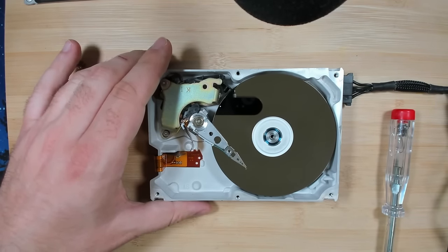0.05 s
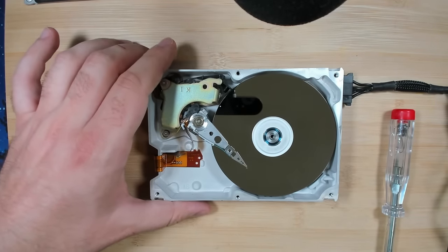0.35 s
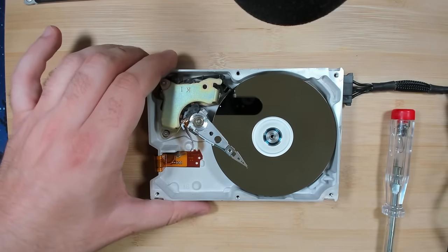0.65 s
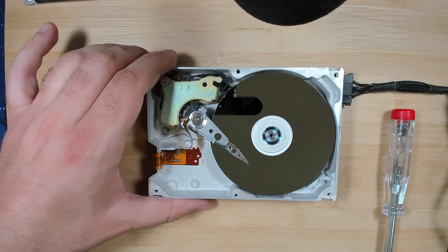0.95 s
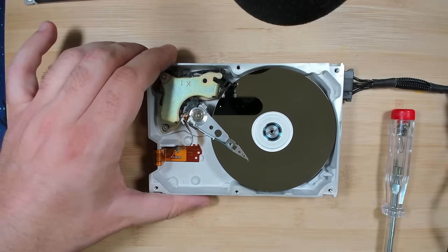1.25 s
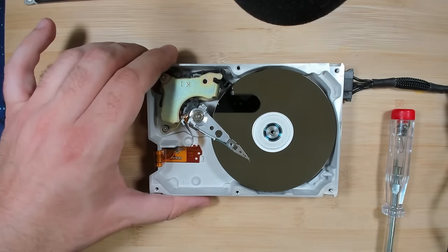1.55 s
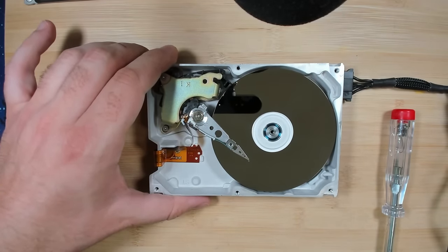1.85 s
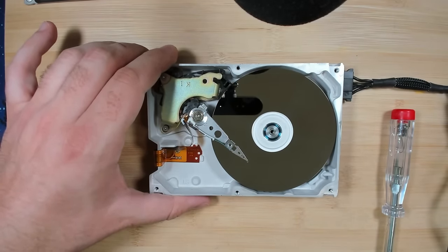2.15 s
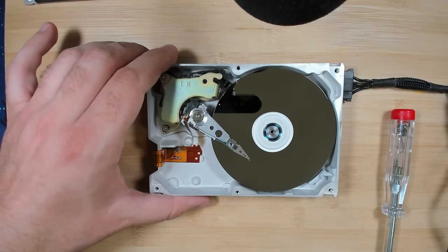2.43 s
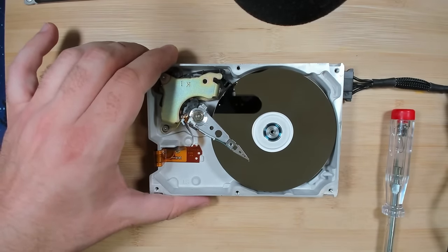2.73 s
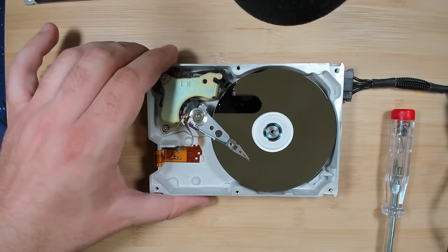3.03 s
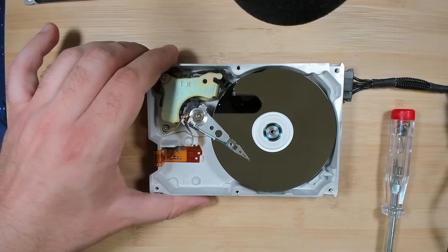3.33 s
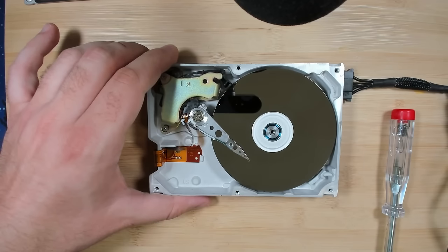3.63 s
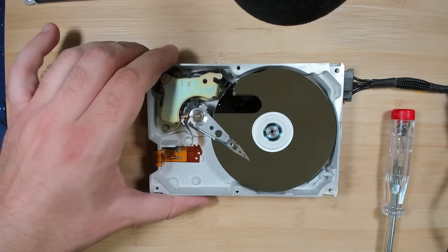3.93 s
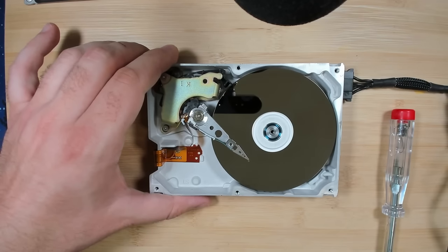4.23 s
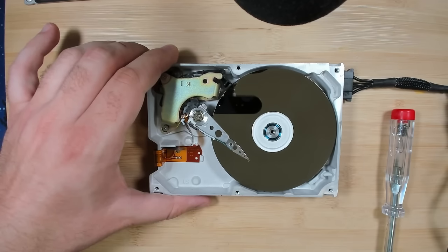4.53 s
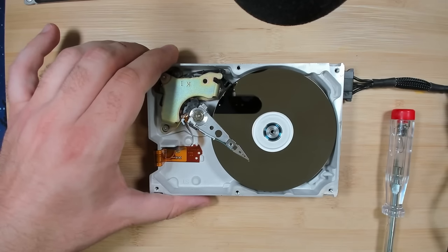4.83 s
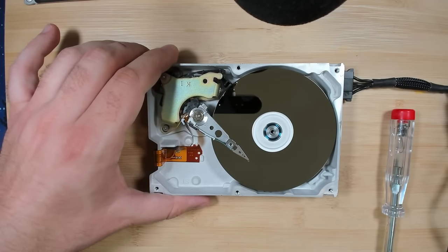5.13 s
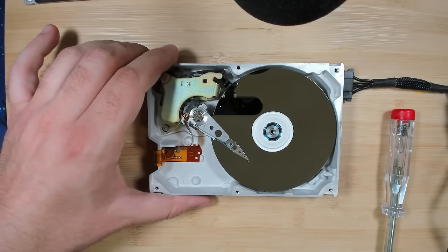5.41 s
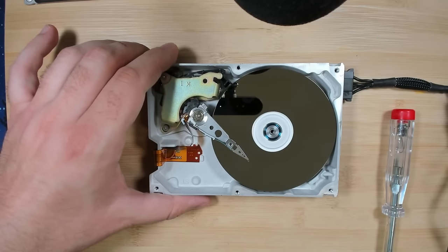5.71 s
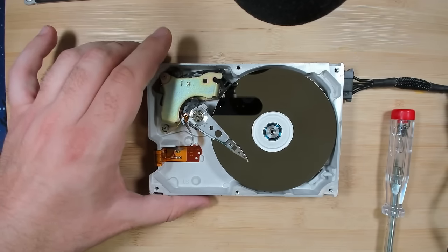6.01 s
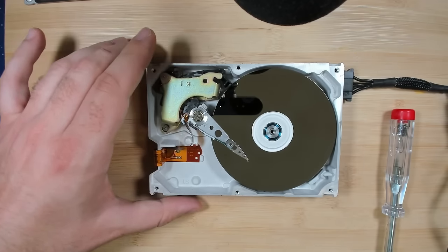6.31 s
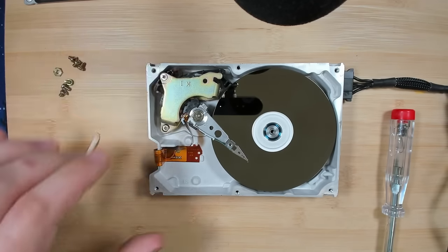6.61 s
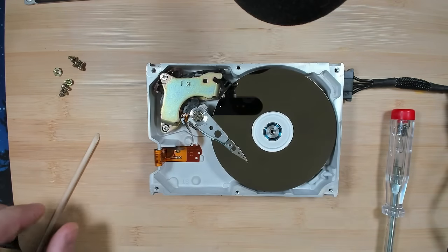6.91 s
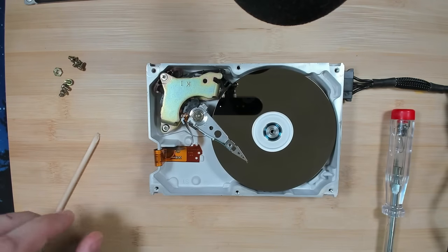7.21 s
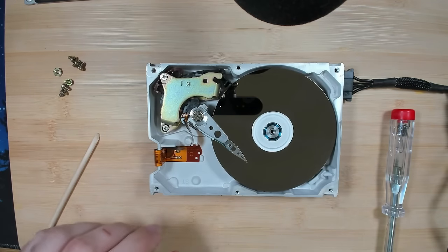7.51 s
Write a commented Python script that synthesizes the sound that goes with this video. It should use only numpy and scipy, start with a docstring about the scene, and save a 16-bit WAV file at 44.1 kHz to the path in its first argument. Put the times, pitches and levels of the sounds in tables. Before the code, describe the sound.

A harsh metallic scrape opens as a hard drive's head drags on its spinning platter, heard up close on a desk in a small, quiet room. The scrape drops to lighter rubbing over the climbing whine of motor and bearing. The head keeps catching, with fast ticks, high chirps and one short falling squeal, and a few soft knocks sound. Loud, ringing grinding returns at the end as the whine sags a little.

```python
"""An opened hard drive spins up on a wooden desk, its motor and worn ball bearing whining upwards.
From the start the head grinds on the platter and friction makes the arm sing. At 0.8 s it lifts to a
light rub and, while a hand holds the casing, stutters with each turn, ticking and squeaking as it catches.
Dull knocks sound nearby: a faint one at 1.5 s, one at 2 s, then two around a falling squeal at 5.1 s.
From 6.6 s the head grinds again and brakes the disc. The room murmurs underneath throughout."""
import sys
import numpy as np
from scipy import signal
from scipy.fft import rfft, irfft
from scipy.io import wavfile

SR = 44100
rng = np.random.default_rng(int(sys.argv[2]) if len(sys.argv) > 2 else 0)


def inscribe(sig):
    """Save sig as 16-bit PCM at rate SR to the path in sys.argv[1].

    A 1-D sig is mono; a 2-D sig holds one channel per row.
    Samples are clipped to [-1, 1] before scaling.
    """
    pcm = np.round(np.clip(np.atleast_2d(sig).T, -1, 1) * 32767)
    wavfile.write(sys.argv[1], SR, pcm.astype(np.int16))


N = 333396
TIME = np.arange(N) / SR
FILTER_HZ = np.arange(4097) * SR / 8192


def from_db(db):
    """Decibels to gain."""
    return 10 ** (np.asarray(db) / 20)


def unit_rms(x):
    """Scale to unit power."""
    return x / np.sqrt(np.mean(x ** 2) + 1e-20)


def automation(rows):
    """Read each lane of a breakpoint curve at every sample."""
    times, *lanes = np.transpose(rows)
    return [np.interp(TIME, times, lane) for lane in lanes]


def eq_db(points, hz):
    """Read an EQ curve on a log-frequency axis."""
    knots, db = np.transpose(points)
    return np.interp(np.log(np.maximum(hz, 1)), np.log(knots), db)


def drift(rate):
    """Smooth random modulation of unit power, renewed `rate` times a second."""
    return unit_rms(np.interp(TIME * rate, np.arange(4096), rng.standard_normal(4096)))


def equalise(x, gain):
    """Minimum-phase filter with the given gain at each of FILTER_HZ."""
    cepstrum = irfft(np.log(gain + 1e-9))
    half = len(cepstrum) // 2
    cepstrum[1:half] *= 2
    cepstrum[half + 1:] = 0
    return signal.oaconvolve(x, irfft(np.exp(rfft(cepstrum))))[:N]


def coloured_noise(curve_db):
    """Unit-power noise shaped by an EQ curve."""
    return unit_rms(equalise(rng.standard_normal(N), from_db(curve_db)))


# EQ of the room tone: (frequency [Hz], gain [dB])
ROOM_EQ = [(15, -84), (25, -15), (80, 0.5), (107, -3.5), (151, 3.5), (189, -18), (245, 1), (275, -2),
           (298, -0.5), (362, -13.5), (461, -10), (648, -10.5), (926, -10), (1200, -10), (1560, -42),
           (2640, -120)]
# hum tones: (frequency [Hz], level [dB])
HUM_TONES = [(100, -69.5), (269, -76)]


def room_tone(air_db):
    """A bed of low, murmuring air with a faint hum."""
    air = coloured_noise(eq_db(ROOM_EQ, FILTER_HZ))
    hum = sum(from_db(db) * np.sqrt(2) * np.sin(2 * np.pi * hz * TIME) for hz, db in HUM_TONES)
    return from_db(air_db) * air + hum


# spin-up and braking: (time [s], speed [turns/s])
SPIN_CURVE = [(0.0, 31.92), (0.8, 35.96), (1.3, 39.36), (1.65, 42.0), (2.0, 44.26), (2.25, 45.44),
              (2.6, 47.93), (3.0, 50.57), (3.5, 53.55), (4.0, 56.25), (4.5, 58.1), (5.0, 59.64),
              (5.5, 60.68), (6.0, 61.51), (6.55, 61.94), (7.1, 60.68), (7.56, 59.86)]


def rotation():
    """The platter's running count of turns and its speed, which drive whine and stutter."""
    speed, = automation(SPIN_CURVE)
    return np.cumsum(speed) / SR, speed


# body EQ of the casing: (frequency [Hz], gain [dB])
CASING_EQ = [(600, -31.5), (1000, -19), (1250, -14.5), (1550, -8), (1750, -5.5), (2000, -2.5), (2600, -2),
             (3100, -1.5), (3400, 1.5), (4100, -3.5), (5000, -13.5), (7400, -13), (9000, -19), (12000, -30)]


def casing_db(hz):
    """How strongly the casing radiates the spindle's vibration at this pitch."""
    return eq_db(CASING_EQ, hz)


# tone curve of the ball passes: (harmonic [number], gain [dB])
BALL_TONE = [(1, -8), (4, -8), (5, -2), (6, 0), (7, 0), (8, -1), (9, 1), (10, 1), (11, -7), (12, -1),
             (13, -3), (16, -4), (19, -3), (26, -9)]
# cluster around each harmonic: (offset [multiples of the cage rate], gain [dB])
CAGE_SIDEBANDS = [(-2, -14.5), (-1, -7.5), (0, -4), (1, -44.5), (2, -8)]


def bearing(turns, speed, waver, balls=8, passes_per_turn=4.775, harmonics=26):
    """Balls roll over a flaw in the race; unequal balls give each harmonic sidebands at the cage rate."""
    passes = passes_per_turn * turns
    sidebands = np.array([from_db(db) * np.exp(2j * np.pi * round(offset) * passes / balls)
                          for offset, db in CAGE_SIDEBANDS])
    slip = .006 * drift(35)  # slipping balls blur the high harmonics most
    fundamental = np.exp(2j * np.pi * (passes + slip))
    harmonic, out = 1, np.zeros(N)
    for k in range(1, harmonics + 1):
        harmonic = harmonic * fundamental
        cluster = np.exp(2j * np.pi * rng.random(len(sidebands))) @ sidebands
        gain = from_db(eq_db(BALL_TONE, k) + casing_db(k * passes_per_turn * speed))
        out += gain * (1 + waver * drift(15)) * (cluster * harmonic).real
    return out


# tones locked to the rotation: (pitch [multiples of the turn rate], gain [dB]); orders 24 and 62 come from
# waviness of the bearing races, the rest from the motor
LOCKED_PARTIALS = [(24, -5), (36, 1), (62, -6), (72, -1), (108, 4), (144, 0), (162, -3), (180, 4), (204, -2),
                   (216, 1)]


def motor(turns, speed, waver_db):
    """Cogging and switching of the motor, and waviness of the bearing races, make clean tones locked to the
    rotation."""
    out = np.zeros(N)
    for order, db in LOCKED_PARTIALS:
        gain = from_db(db + casing_db(round(order) * speed) + waver_db * drift(11))
        out += gain * np.sqrt(2) * np.sin(2 * np.pi * round(order) * turns)
    return out


# fader rides of the whine: (time [s], bearing gain [dB], gain of the locked motor and waviness tones [dB])
WHINE_FADERS = [(0, -45.5, -63), (.9, -53, -54), (1.4, -53, -60), (1.55, -51.5, -55.5), (2.3, -51.5, -52),
                (3.2, -48, -58), (4.5, -50.5, -53), (6.5, -49, -62), (7.56, -45.5, -54)]


def spindle(turns, speed):
    """Bearing whine, rolling hiss, and clean tones from the motor and the wavy races, all coloured by the
    casing."""
    bearing_db, motor_db = automation(WHINE_FADERS)
    hiss = coloured_noise(casing_db(FILTER_HZ))
    rolling = bearing(turns, speed, waver=.2) + from_db(-4) * hiss
    return from_db(bearing_db) * rolling + from_db(motor_db) * motor(turns, speed, waver_db=1.5)


# grind cues: (hold start [s], hold end [s], level [dB], attack [s])
GRIND_CUES = [(0, 0.799, -25, .02), (1.279, 1.292, -23, 0.02), (1.967, 1.986, -27.5, .005),
              (2.075, 2.257, -25, 0.045), (5.315, 5.41, -29, 0.02), (6.63, 6.953, -25.5, 0.049),
              (6.996, 7.04, -28.5, 0.044), (7.174, 7.6, -24.5, 0.11)]


def grinding(release_s=.026, tail_db=-9.5, tail_s=.079):
    """Force envelope of the head digging in: it swells, holds, lets go and leaves a fading rub."""
    force = np.zeros(N)
    for start, end, db, attack_s in GRIND_CUES:
        early, late = np.maximum(start - TIME, 0), np.maximum(TIME - end, 0)
        release = np.maximum(np.exp(-late / release_s), from_db(tail_db) * np.exp(-late / tail_s))
        force = np.maximum(force, from_db(db) * np.exp(-early / attack_s) * release)
    return force


def friction(grains_per_s, spread_db, hiss):
    """Grit of tiny, uneven impacts over a smooth hiss; unit power."""
    sizes = from_db(spread_db * np.minimum(rng.exponential(1, N), 4)) * rng.choice([-1, 1], N)
    grains = unit_rms(sizes * (rng.random(N) < grains_per_s / SR))
    return unit_rms(grains + hiss * rng.standard_normal(N))


# brightness of the light rub: (time [s], treble against the lower band [dB])
RUB_TREBLE = [(1.2, -7.5), (1.85, -6.5), (2.4, -12), (3.7, -12.5), (4.3, -9), (6.1, -9.5), (6.55, -7.5)]


def brightness_db(grind, touch, speed, bite_db=-36):
    """Treble balance of the scrape: once the head bites, a faster platter sounds brighter."""
    dug_in = grind / (grind + touch + from_db(bite_db))
    grind_db = -4 + .1461 * (speed - speed.mean())
    rub_db, = automation(RUB_TREBLE)
    return dug_in * grind_db + (1 - dug_in) * rub_db


# broad EQ of the scrape: (frequency [Hz], gain [dB])
SCRAPE_EQ = [(200, -26), (400, -26.5), (650, -24.5), (1150, -24.5), (1500, -18.5), (2400, -17.5),
             (3200, -5), (4700, -2.5), (5400, -8.5), (7000, -13), (7700, -13.5), (10000, -8),
             (13400, -13.5), (14400, -24)]
# resonances: (frequency [Hz], width [Hz], first-grind gain [dB], stutter gain [dB], last-grind gain [dB])
DRIVE_RESONANCES = [(1042, 499, -5, 2, -6), (1729, 103, 4, 13, 6), (2084, 111, 9, 10, 7),
                    (2685, 69, 10, 5, 2), (2921, 133, 6, 7, 3), (3103, 112, 3, 11, 10),
                    (3345, 133, 11, 11, 10), (3446, 145, 10, 5, 8), (3571, 101, 8, 9, 2),
                    (3773, 154, -8, 6, 7), (3902, 57, 9, -1, -2), (4231, 165, 5, 2, 5),
                    (4553, 172, 9, 9, 10), (4715, 176, 2, 5, -3), (5077, 185, -4, -7, -8),
                    (5194, 154, -1, 5, 9), (6028, 209, 6, 5, 4), (6632, 209, 12, 12, 16),
                    (7013, 235, 15, 10, 15), (8318, 147, 4, 10, 8), (8594, 211, 15, -1, 5),
                    (9409, 296, -2, -3, 7), (10080, 208, -1, 3, 8), (10374, 322, 4, -1, -1),
                    (11199, 339, 12, 11, 16), (11926, 215, 10, 5, 11), (12691, 127, 5, 5, 16),
                    (13069, 229, 8, 6, 16), (14805, 201, 15, 10, 16), (15508, 127, -1, 1, 13)]


def drive_ring(rub, treble_db, crossover_hz=7800):
    """Friction rings arm, platter and casing; the peaks change height as the head bears differently."""
    # crossfade of three EQs: the head eases off in two steps and bears down again at 6.6 s
    stage = np.interp(TIME, [.9, 1.2, 2.3, 2.5, 6.56, 6.62], [0, .5, .5, 1, 1, 2])
    modes = np.array(DRIVE_RESONANCES)
    centres, widths = modes[:, :1], modes[:, 1:2]
    bells = 1 / (1 + ((FILTER_HZ - centres) / (widths / 2)) ** 2)
    treble = 1 / (1 + (crossover_hz / np.maximum(FILTER_HZ, 100)) ** 24)
    out = np.zeros(N)
    for k, heights_db in enumerate(modes[:, 2:].T):
        gain = from_db(eq_db(SCRAPE_EQ, FILTER_HZ) + heights_db @ bells)
        part = rub * np.clip(1 - abs(stage - k), 0, 1)
        out += equalise(part, unit_rms(gain * (1 - treble)))
        out += equalise(part * from_db(treble_db), unit_rms(gain * treble))
    return out


def high_spot(turns, angle_turns, fade_turns, uneven_db):
    """A high spot of the platter pulses against the head on each turn, never twice alike."""
    laps = turns + 1 - angle_turns
    strength = from_db(uneven_db * np.clip(rng.standard_normal(1024), -2, 2))
    return unit_rms(strength[laps.astype(int)] * np.exp(-(laps % 1) / fade_turns))


def stutter(pulse, share):
    """Steady contact with a share of its power (0-1) moved into the pulse."""
    return np.sqrt(1 - share + share * pulse ** 2)


# fader ride of the head's light rub between grinds: (time [s], level [dB])
RUB_FADER = [(.9, -50), (1.08, -65.5), (1.24, -47.5), (1.58, -62.5), (1.88, -58), (2.5, -52.5),
             (2.72, -48.5), (3.1, -52.5), (3.38, -42.5), (4.0, -38), (4.46, -38), (4.57, -40), (4.7, -36),
             (4.91, -34), (5.08, -33), (5.22, -35.5), (5.5, -34), (5.72, -39.5)]


def scrape(turns, speed):
    """The head drags on the platter: grinds, light rub and catches drive one friction texture."""
    touch_db, = automation(RUB_FADER)
    grind, touch = grinding(), from_db(touch_db)
    pulse = high_spot(turns, angle_turns=.8, fade_turns=.33, uneven_db=5.1)
    drag = np.hypot(grind * stutter(pulse, share=.1), touch * stutter(pulse, share=.7))
    drag *= from_db(.13 * drift(250))
    hits = scored_spots(turns, touch_db, uneven_db=5.2) + hard_catches()
    bursts, ticks = snags(hits, burst_db=-4.5, tick_db=1)
    rub = ticks + np.hypot(drag, bursts) * friction(grains_per_s=9000, spread_db=2, hiss=.9)
    return drive_ring(rub, brightness_db(grind, touch, speed))


# held tones in the grinds: (start [s], end [s], pitch [Hz], level [dB])
SINGING_CUES = [(0, .78, 3410, -32), (.3, .78, 4530, -35), (0, .93, 2695, -46), (6.62, 6.96, 3130, -37),
                (6.65, 7.04, 6630, -36), (7.17, 7.6, 3400, -30), (7.17, 7.6, 4490, -37)]


def singing(wander_hz, rough, fade_s=.02):
    """Hard friction feeds single modes of the arm, which ring on unsteadily."""
    out = np.zeros(N)
    for start, end, hz, db in SINGING_CUES:
        held = np.clip(np.minimum(TIME - start, end - TIME) / fade_s, 0, 1)
        phase = 2 * np.pi * np.cumsum(hz + wander_hz * drift(200)) / SR
        out += held * from_db(db) * (1 + rough * drift(150)) * np.sin(phase)
    return out


# runs of ticks: (start [s], end [s], platter angle [turns], accent on the rub fader [dB])
SPOT_RUNS = [(.87, 1.46, .83, 24), (1.8, 1.95, .81, 22), (3.25, 4.52, .84, 12), (5.42, 6.56, .78, 13),
             (2.55, 3.55, .08, 20), (3.55, 4.52, .06, 15.5), (4.66, 4.87, .09, 13), (4.95, 5.19, .09, 11),
             (5.45, 6.56, .09, 9)]


def scored_spots(turns, touch_db, uneven_db, decay_s=.0035):
    """Hits from two scored spots a quarter turn apart, each clipping the head as hard as it bears."""
    hits = []
    for start, end, angle, accent_db in SPOT_RUNS:
        crossings = np.flatnonzero(np.diff(np.floor(turns - angle)))
        scatter_db = uneven_db * np.clip(rng.standard_normal(1024), -2, 2)
        hits += [(TIME[i], touch_db[i] + accent_db + db, decay_s)
                 for i, db in zip(crossings, scatter_db) if start < TIME[i] < end]
    return hits


def snags(hits, burst_db, tick_db, rise_s=.0004):
    """Each hit (time [s], level [dB], decay [s]) snags the head: a tick and a short burst of friction."""
    bursts, ticks, age = np.zeros(N), np.zeros(N), TIME[:SR // 10]
    for time, db, decay_s in hits:
        start = int(time * SR)
        burst = from_db(db + burst_db) * (1 - np.exp(-age / rise_s)) * np.exp(-age / decay_s)
        span = slice(start, start + len(age))
        bursts[span] = np.maximum(bursts[span], burst[:N - start])
        ticks[start:start + 3] = from_db(db + tick_db) * np.array([.25, .5, .25])
    return bursts, ticks


# hard catches of the head: (time [s], relative hit level [dB], relative squeak level [dB])
CATCH_CUES = [(1.217, -22, -52), (1.9533, -19, -47), (2.5344, -26.5, -34), (2.6667, -15.5, -35),
              (2.727, -29, -35), (3.0073, -19, -51), (3.1799, -18.5, -36), (3.2033, -18.5, -42),
              (3.3372, -19, -32), (3.472, -30, -26), (3.5828, -15.5, -38), (3.657, -15.5, -33),
              (3.712, -26, -30.5), (3.7668, -18, -35), (3.8062, -18.5, -27), (3.8358, -20.5, -25),
              (3.9258, -19, -30), (3.9622, -18, -22.5), (4.0193, -16, -25.5), (4.0918, -16.5, -21),
              (4.1777, -16, -30), (4.3178, -15.5, -32), (4.4902, -19, -36), (4.6396, -26, -21.5),
              (4.7581, -22, -42), (4.781, -17, -41), (4.9846, -14, -42), (5.0554, -18.5, -28),
              (5.235, -14.5, -48), (5.281, -13.5, -43), (5.6173, -18.5, -33), (5.66, -18.5, -36),
              (5.7955, -17.5, -40), (5.8112, -20, -23), (5.8685, -22, -24), (5.9517, -16, -52),
              (6.0523, -16.5, -23.5), (6.0988, -30, -25), (6.115, -17.5, -25), (6.2023, -18.5, -34),
              (6.3096, -15.5, -51), (6.4936, -14.5, -40), (6.568, -24, -23)]


def hard_catches(decay_s=.0048):
    """Hits where the head catches hard on the platter."""
    return [(time, db, decay_s) for time, db, _ in CATCH_CUES]


def squeaks(gain_db, swell_s, rough, pitch_hz=3248, spread_hz=57):
    """In a hard catch the head sticks and slips for a moment, so the arm chirps."""
    out, age = np.zeros(N), TIME[:SR // 10]
    slips = 1.3 * drift(600)
    swell = age / swell_s * np.exp(1 - age / swell_s)
    for time, _, db in CATCH_CUES:
        start = int(time * SR)
        span = slice(start, start + len(age))
        hz = pitch_hz + spread_hz * rng.standard_normal()
        out[span] += from_db(db + gain_db) * swell * np.sin(2 * np.pi * hz * age + slips[span])
    return out * (1 + rough * drift(450))


# knock cues: (time [s], relative level [dB])
KNOCK_CUES = [(1.515, -49), (2.002, -30.5), (4.89, -29.5), (5.318, -30.5)]
# body of a knock: (frequency [Hz], gain [dB], 60 dB decay time [s])
KNOCK_BODY = [(450, -14, 0.065), (512, -9, 0.11), (598, 0, 0.03), (690, 4, 0.021), (780, -7, 0.06),
              (910, -2, 0.01), (1260, -19, 0.07)]


def knocks(gain_db):
    """Soft blows ring a few low, well damped modes."""
    blows, age = np.zeros(N), TIME[:SR // 4]
    for time, db in KNOCK_CUES:
        blows[int(time * SR)] = from_db(db + gain_db)
    ring = sum((-1) ** k * from_db(db - 60 * age / t60) * np.sin(2 * np.pi * hz * age)
               for k, (hz, db, t60) in enumerate(KNOCK_BODY))
    return signal.oaconvolve(blows, ring)[:N]


# glide of the squeal: (time [s], pitch [Hz], level [dB])
SQUEAL_GLIDE = [(5.07, 3440, -70), (5.1, 3300, -30), (5.14, 2990, -32), (5.17, 2660, -44), (5.2, 2550, -70)]


def squeal(rough, jitter_hz):
    """A drawn-out stick-slip of the head, rasping and falling in pitch."""
    hz, level_db = automation(SQUEAL_GLIDE)
    phase = 2 * np.pi * np.cumsum(hz + jitter_hz * drift(810)) / SR
    gate = (TIME > SQUEAL_GLIDE[0][0]) & (TIME < SQUEAL_GLIDE[-1][0])
    return gate * from_db(level_db) * (1 + rough * drift(630)) * np.sin(phase)


def reflections(x, t60, level_db):
    """A dense tail of echoes after a millisecond of pre-delay."""
    age = TIME[:SR // 2]
    tail = rng.standard_normal(len(age)) * from_db(-60 * age / t60) * (age > .001)
    return from_db(level_db) * signal.oaconvolve(x, tail / np.linalg.norm(tail))[:N]


def scene():
    """Mono mix of the drive on its desk in a small room."""
    turns, speed = rotation()
    direct = scrape(turns, speed)
    direct += squeaks(gain_db=-2, swell_s=.005, rough=.66)
    direct += spindle(turns, speed)
    direct += knocks(gain_db=-3.5)
    direct += squeal(rough=.8, jitter_hz=450)
    direct += singing(wander_hz=35.7, rough=.34)
    desk = reflections(direct, t60=.074, level_db=-6)
    room = reflections(direct, t60=.16, level_db=-10.5)
    return (direct + desk + room + room_tone(air_db=-62.5))[None]


def record(dry):
    """The microphone loses the bass below 45 Hz; the top is cut steeply at 15.8 kHz."""
    thin = signal.sosfilt(signal.butter(2, 45, "high", fs=SR, output="sos"), dry)
    return signal.sosfilt(signal.ellip(12, .1, 90, 15800, fs=SR, output="sos"), thin)


dry = scene()
out = record(dry)
inscribe(out)
```